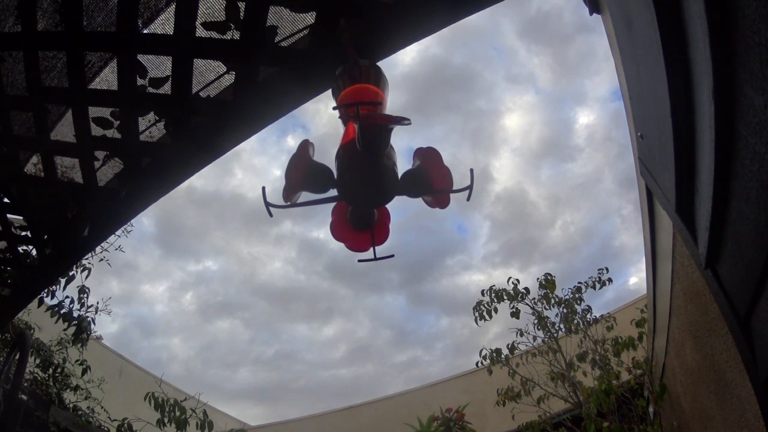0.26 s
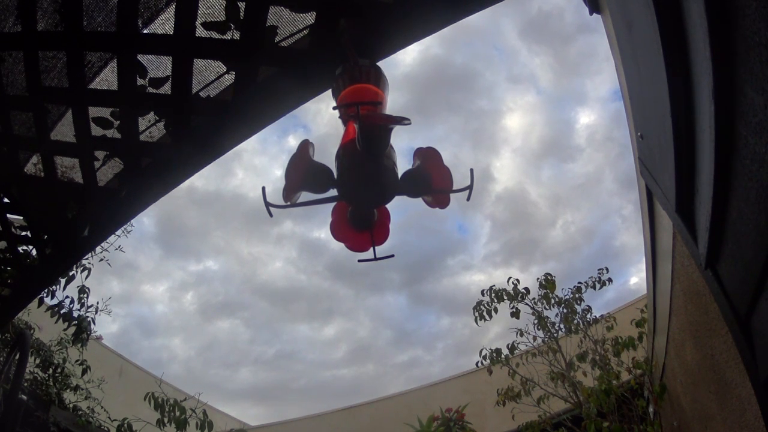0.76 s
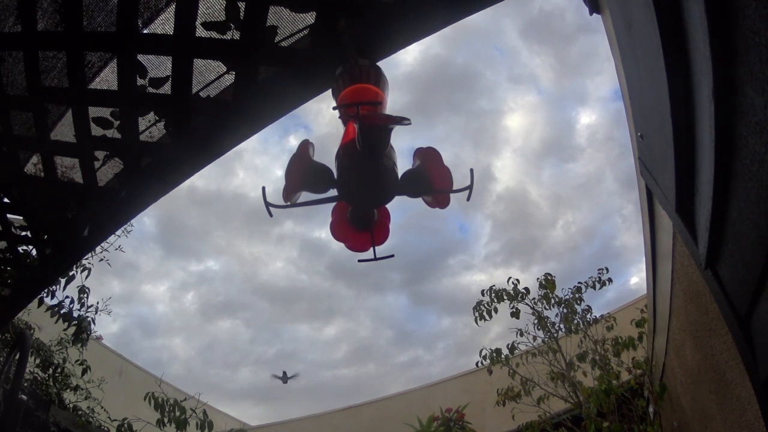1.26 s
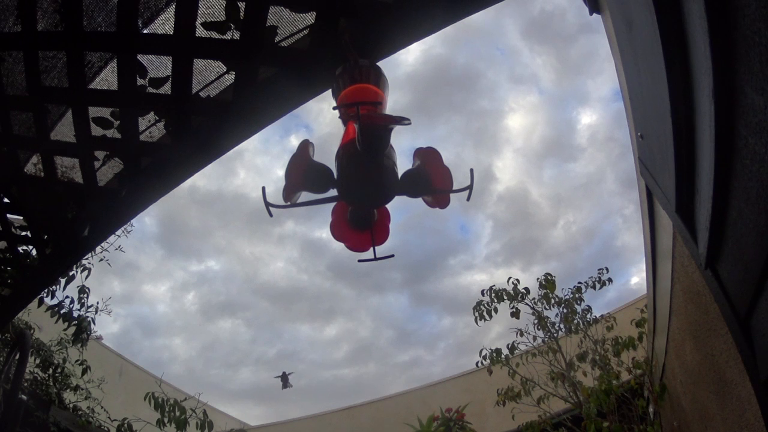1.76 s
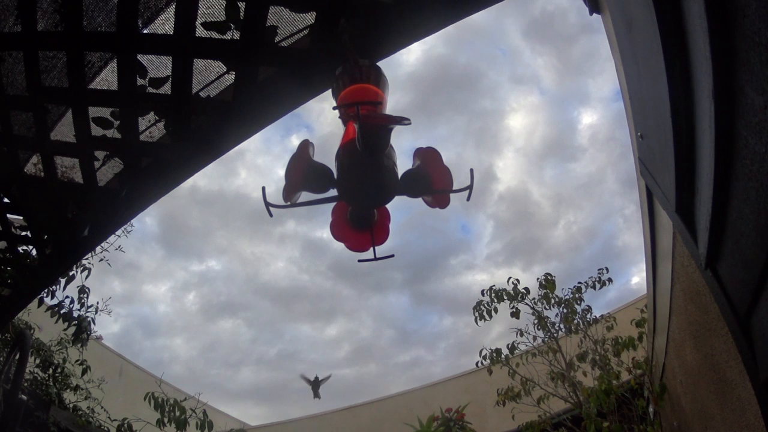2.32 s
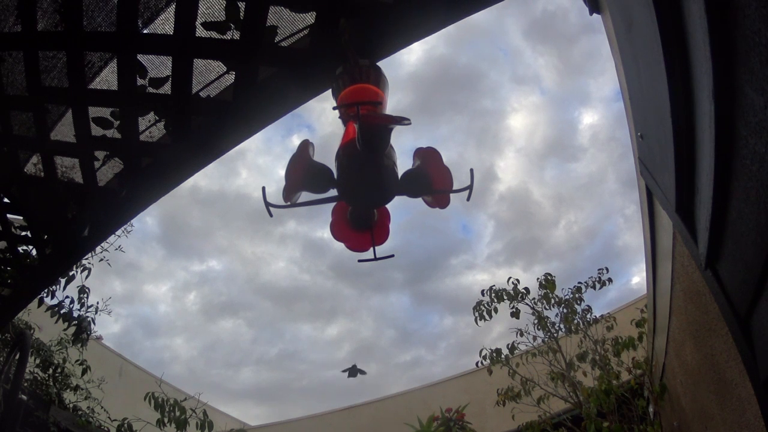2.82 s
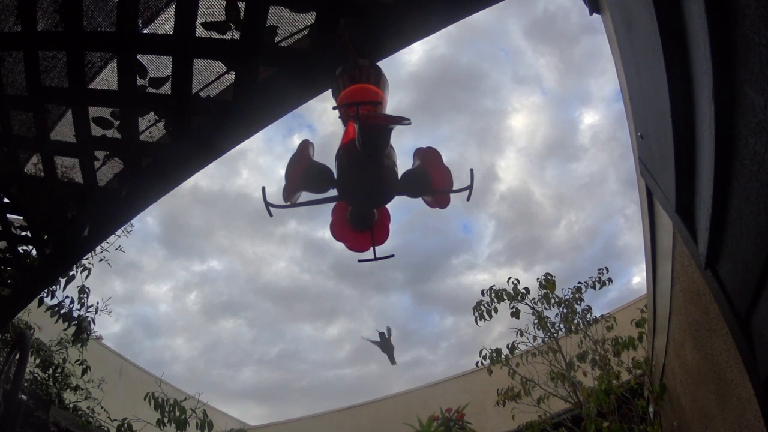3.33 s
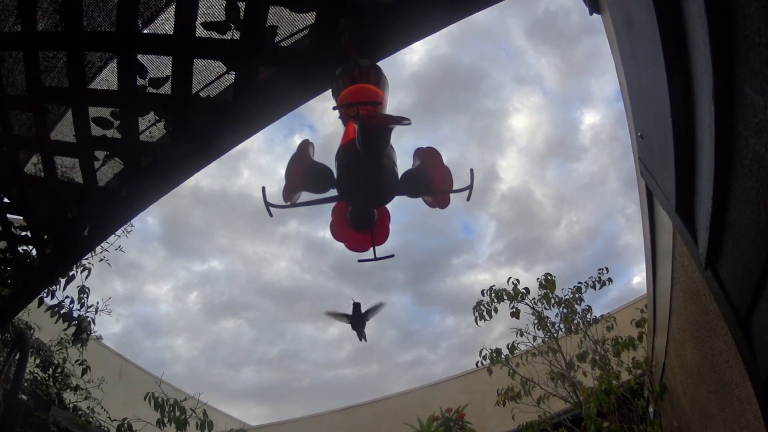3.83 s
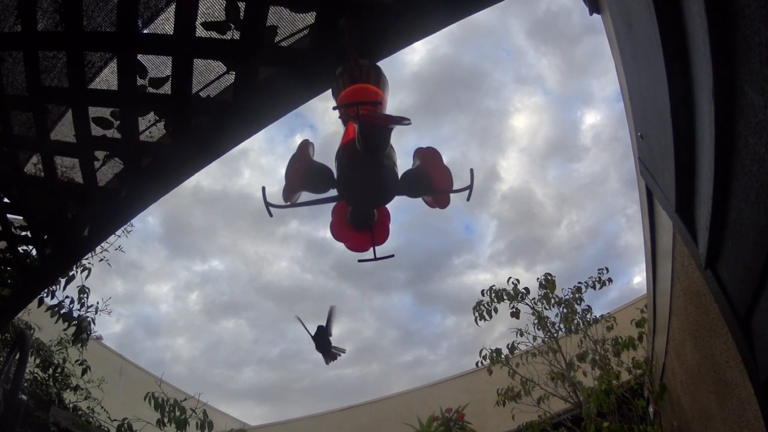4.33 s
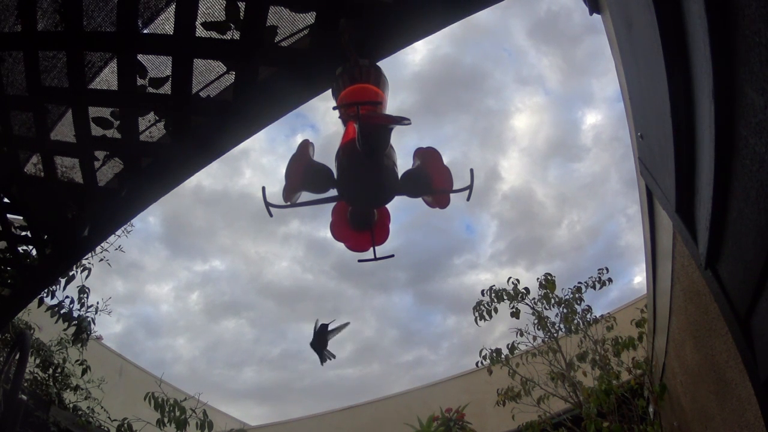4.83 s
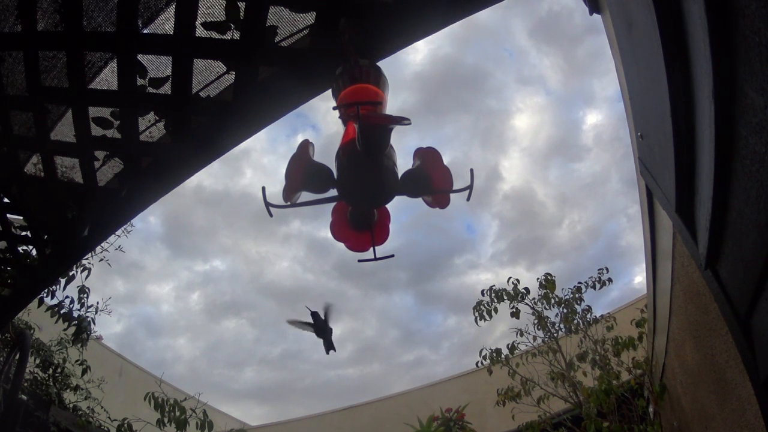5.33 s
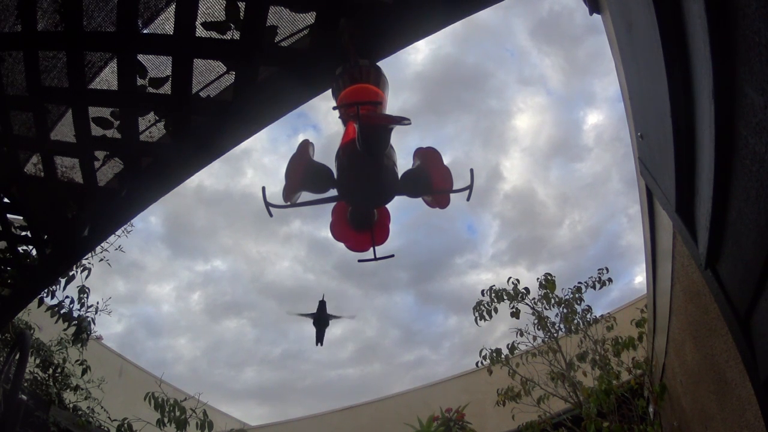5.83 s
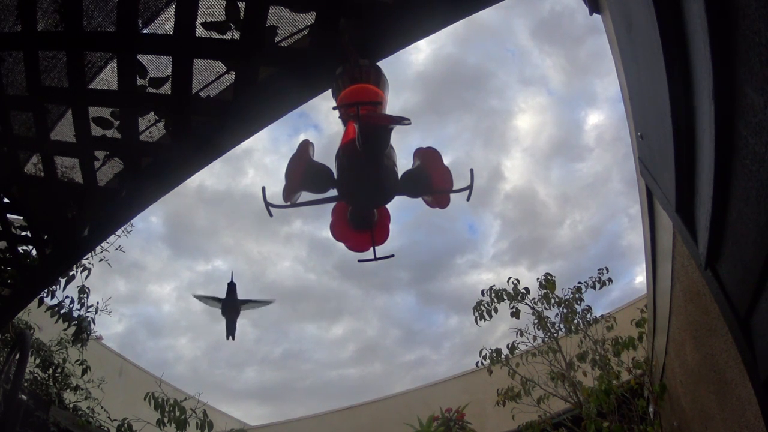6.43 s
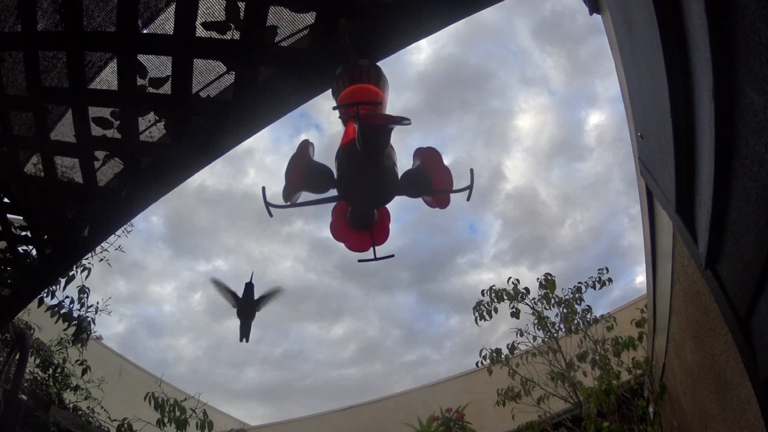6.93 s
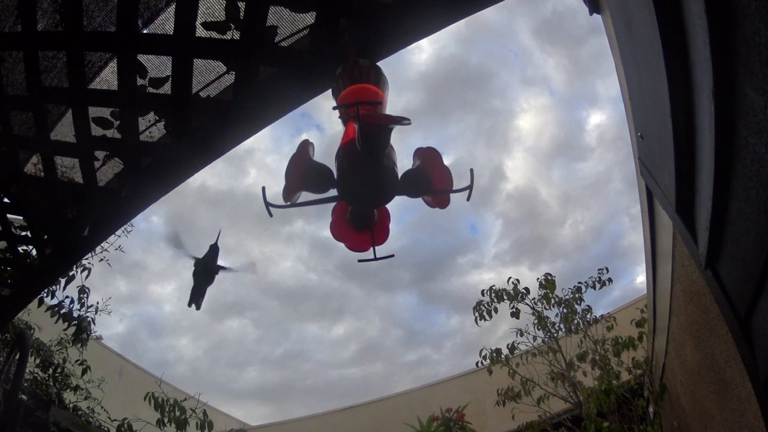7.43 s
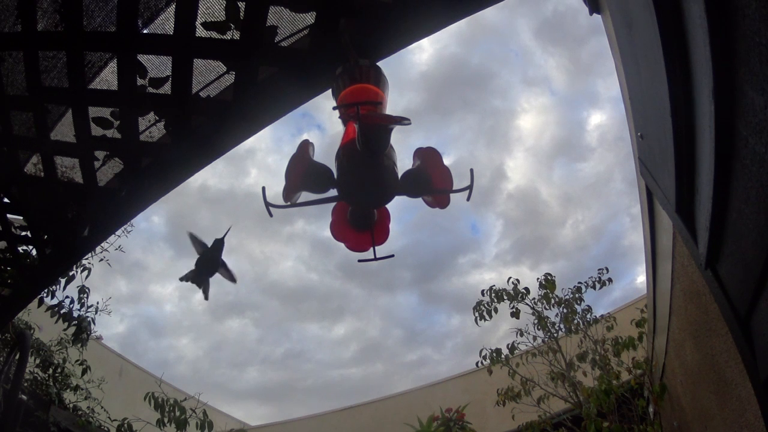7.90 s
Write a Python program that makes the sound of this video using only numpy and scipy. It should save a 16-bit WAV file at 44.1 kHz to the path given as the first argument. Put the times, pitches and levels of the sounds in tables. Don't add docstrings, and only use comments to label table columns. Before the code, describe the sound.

A quiet backyard with a steady, slightly wavering low motor drone from a fan unit and a soft, dull wash of distant town traffic, constant for about eight seconds. A hummingbird's wings are barely audible at first, then flutter as a low buzzing hum with feathery hiss, surging at darts near 1.2, 3.0, 3.75, 4.2, 6.2 and 7.4 s. Sharp, dry, very high chips, each a click-like whistle dropping steeply within about a hundredth of a second, start faintly at 1.55, 1.9, 2.3 and 2.8 s. A close pair comes at 3.5 and 3.6, then clearer single chips at 4.1, 4.75, 5.7, 6.1, 6.8 and 7.3, the loudest at 8.0 s. Short scattered reflections from feeder, lattice and walls follow each. The small stereo camera microphone sits near a wall; the bird gradually approaches, slightly left, then central.

```python
import sys
import numpy as np
from scipy import signal
from scipy.io import wavfile
from scipy.ndimage import uniform_filter1d

SR = 44100
rng = np.random.default_rng(int(sys.argv[2]) if len(sys.argv) > 2 else 0)


def amplitude_ratio(level_db):
    exponent = np.asarray(level_db, float) / 20
    return 10 ** exponent


def int16_out(signal):
    q = np.round(np.clip(np.atleast_2d(signal).T, -1, 1) * 32767)
    wavfile.write(sys.argv[1], SR, q.astype(np.int16))


N = 359856

# t/s, swish level/dB, hum level/dB, wing beat f/Hz, left-right balance/dB
FLIGHT = [(0, -72, -71, 45.2, -1), (1.1, -67, -68, 45.53, -1), (1.6, -64, -48, 44.3, -3),
          (2.2, -63, -62, 44.07, -3), (2.85, -62, -52, 45.07, -3.5), (3.25, -61, -45, 45, 0.5),
          (3.6, -62, -56, 45.7, -4), (4.5, -61, -46.5, 44.98, -3), (4.95, -61, -44, 43.25, -1.5),
          (5.45, -59, -55, 42.06, -3.5), (6.0, -61, -60, 43.15, -2), (6.6, -59, -46.5, 43.6, 0),
          (7.3, -58.5, -44.5, 42.4, 1), (8.16, -57, -44.5, 43, 0)]
# f/Hz, phase/rad
PORT_LEAD = [(60, -.3), (800, -.3), (1000, -2.4), (1400, -1.85), (2400, -1.4), (4000, -1.4), (5000, -.8),
             (7500, -.1), (11000, -.05)]
# f/Hz, level/dB
PORT_TILT = [(60, -2.2), (170, -2.6), (350, -2), (520, -.7), (700, 1), (930, 4.5), (1200, 1), (1600, -1.3),
             (2500, .3), (11000, 0)]
PORT_SHARE = np.array([[.5], [-.5]])
FAR_DB = -26
CHIP_START_MS, CHIP_END_MS = -16, 14
CHIP_MS = np.arange(CHIP_START_MS, CHIP_END_MS, 1000 / SR)


def evened(x):
    return x / np.sqrt(np.mean(x ** 2) + 1e-20)


def read(points, hz):
    f, value = np.transpose(points)
    return np.interp(np.log(hz + 1), np.log(f + 1), value)


def add(mix, s, sound):
    part = mix[:, round(s * SR):][:, :sound.shape[1]]
    part += sound[:, :part.shape[1]]


def drift(low_hz, top_hz, t):
    rates = np.geomspace(low_hz, top_hz, num=24)
    return evened(sum(np.sin(2 * np.pi * (f * t + rng.random())) / np.sqrt(f) for f in rates))


def noise(spectrum, patchy_db):
    # f/Hz, left-right likeness (0 to 1)
    likeness = [(60, .99), (200, .99), (350, .9), (520, .76), (700, .58), (930, .1), (1350, .54),
                (2100, .36), (4000, .24), (6000, .42), (11000, .72)]
    hz = np.fft.rfftfreq(2048, 1 / SR)
    a, b, c, d, patches = rng.standard_normal((N // 512 + 5, len(hz), 5)).T
    patches = uniform_filter1d(patches, size=14, axis=0)
    patches = evened(uniform_filter1d(patches, size=8, axis=1))
    same = np.clip(read(likeness, hz), 0, 1)[:, None]
    right = a + 1j * b
    left = same * right * np.exp(1j * read(PORT_LEAD, hz))[:, None]
    left = left + np.sqrt(1 - same ** 2) * (c + 1j * d)
    tilt = amplitude_ratio(read(PORT_TILT, hz) / 2)[:, None]
    colour = amplitude_ratio(read(spectrum, hz)[:, None] + patchy_db * patches)
    z = np.array([left * tilt, right / tilt]) * colour
    return evened(signal.istft(z, nperseg=2048, noverlap=1536)[1][:, :N])


def wings(t):
    # f/Hz, level per Hz/dB
    feathers = [(800, 1.5), (2000, -0.5), (4000, -0.5), (7000, -5.5), (10000, -2.5), (11500, -10.5)]
    # multiple of the wing beat, level/dB
    harmonics = [(1, -12.5), (2, -4), (3, -2), (4, 0.5), (5, -6), (6, -9.5), (7, -27)]
    # t/s, peak swish level/dB
    darts = [
        (1.23, -55.5),
        (3.02, -53),
        (3.751, -52),
        (4.18, -56),
        (4.4, -57),
        (5.2, -60),
        (6.22, -53),
        (7.1, -60),
        (7.43, -54),
        (8.06, -57),
    ]
    dart_hum_db = 14.5
    swish_db_per_s, hum_db_per_s = 84, 105
    spurt_hz_per_db, gentle_db, spurt_s = .66, -60.5, .21
    s, *columns = np.transpose(FLIGHT)
    swish_db, hum_db, hz, _ = (np.interp(t, s, c) for c in columns)
    swish_power, hum_power = amplitude_ratio(2 * swish_db), amplitude_ratio(2 * hum_db)
    for at, db in darts:
        away_s = np.abs(t - at)
        swish_power = swish_power + amplitude_ratio(2 * (db - swish_db_per_s * away_s))
        hum_power = hum_power + amplitude_ratio(2 * (db + dart_hum_db - hum_db_per_s * away_s))
        hz = hz + spurt_hz_per_db * (db - gentle_db) * np.clip(1 - away_s / spurt_s, 0, 1)
    turns = 2 * np.pi * np.cumsum(hz * (1 + .02 * drift(.98, 12, t))) / SR
    hum = evened(sum(amplitude_ratio(db) * np.cos(k * turns + rng.uniform(0, 6.1) - .39 * PORT_SHARE)
                     for k, db in harmonics))
    hum = np.sqrt(hum_power) * hum * amplitude_ratio(np.array([[-1.2], [1.2]]))
    dart = np.clip((hz - 44) / 5, 0, 1)
    strokes = 1 + .35 * (1 - dart) * np.cos(turns) + .5 * dart * np.cos(2 * turns)
    return hum + np.sqrt(swish_power) * strokes * noise(feathers, patchy_db=2.5)


def drone(t):
    # f/Hz, width/Hz, level/dB
    tones = [(28, 1.7, -61), (122, 3, -50.5), (151.3, 5, -46.5), (311.3, 5, -61), (488.2, 20, -56),
             (624.7, 1.005, -57.5), (840, 3, -64.5)]
    out, slow = np.zeros((2, N)), t[::64]
    for hz, width_hz, db in tones:
        wander = .4 * width_hz * drift(.5 + width_hz / 4, 2 + width_hz, slow)
        swell_db = min(.6 * width_hz, 3) * drift(1 + width_hz / 2, 4 + 2 * width_hz, slow)
        pitch_hz = hz + wander.repeat(64)[:N]
        turns = 2 * np.pi * np.cumsum(pitch_hz) / SR + PORT_SHARE * read(PORT_LEAD, hz)
        level_db = db + swell_db.repeat(64)[:N] + PORT_SHARE * read(PORT_TILT, hz)
        out += amplitude_ratio(level_db) * np.sqrt(2) * np.sin(turns)
    return out


def town(t):
    # f/Hz, level per Hz/dB
    wash_colour = [(12, -55), (22, -18), (55, -19), (100, -8.5), (170, -6.5), (350, -10.5), (520, -13.5),
                   (700, -16), (1000, -17.5), (1400, -23.5), (2400, -26.5), (3400, -33), (6000, -37.5),
                   (11000, -43.5)]
    swell_db = .35 * drift(.295, 4, t)
    return amplitude_ratio(-41.5 + swell_db) * noise(wash_colour, patchy_db=.56)


def chip(level_db, lead_ms, fade_db, notch_hz, pan_db, chance):
    # t from the knee/ms, f/Hz
    fall = [(-10, 8480), (-6, 8340), (-4, 8030), (-2, 7470), (-1, 6800), (0, 5950), (2.8, 3450), (4, 2950),
            (7, 2000)]
    # f/Hz, level/dB
    beak_colour = [(2000, 11), (3000, -3), (4000, -2.5), (5000, 0), (6000, -1), (7500, -1), (8500, 2),
                   (11000, 3.5), (12500, -19)]
    top_hz = 8430
    lattice_share, lattice_ms = .25, .6
    end_ms = 2.3 + .67 * fade_db
    overtone_db = max(5.5 - 2 * lead_ms, -10.5)
    hiss_db = -22.5 - .46 * (level_db - FAR_DB)
    ms = CHIP_MS
    hz = uniform_filter1d(np.interp(ms, *np.transpose(fall)), size=40) * top_hz / 8400
    turns = 2 * np.pi * np.cumsum(hz) / SR
    gate = np.clip((ms + lead_ms + .2) / max(1.6, lead_ms - 5.5), 0, 1)
    gate *= np.interp(ms - min(end_ms, 3.6), [-.5, .5, 2, 3], [1, .35, .24, 0])
    slope_db = np.where(ms < -2.1, 1.5, -fade_db) * (ms + 2.1)
    flutter_db = .7 * evened(uniform_filter1d(uniform_filter1d(chance[0], size=30), size=30))
    effort = amplitude_ratio(level_db + slope_db + flutter_db) * np.sin(np.pi / 2 * gate) ** 2
    effort *= np.abs(1 - lattice_share * np.exp(2j * np.pi * (hz - notch_hz) * lattice_ms / 1000))
    out = []
    for side in (-.5, .5):
        late = -side * .3 * 7000 / hz
        whistle = amplitude_ratio(read(beak_colour, hz)) * np.sin(turns - late)
        octave = amplitude_ratio(overtone_db + read(beak_colour, 2 * hz)) * np.sin(2 * turns - late / 2)
        out.append(amplitude_ratio(-side * pan_db) * effort * (whistle + octave))
    after = ms + lead_ms + 3.7
    click = evened(uniform_filter1d(chance[2], size=3))
    tick = amplitude_ratio(level_db - 21) * (after > 0) * np.exp(-np.abs(after) / .4) * click
    air = signal.lfilter(*signal.butter(1, [2500, 9000], "band", fs=SR), chance[1])
    puff = np.interp(after, [-1, 1, 4, 6, lead_ms + 6, lead_ms + 11], [0, .45, .55, 1, 1, 0])
    return np.array(out) + tick + amplitude_ratio(level_db + hiss_db) * puff * evened(air)


def nearby(x, draw):
    late_ms = .45 + 3.2 * np.arange(6) / 6 + .45 * draw[:, 0]
    size = amplitude_ratio(-3.5 * late_ms - 6 * draw[:, 1]) * np.sign(draw[:, 2] - .5)
    taps = np.zeros((2, 256))
    taps[:, np.round(late_ms * SR / 1000).astype(int)] = size * amplitude_ratio(6.8 * draw[:, 3:].T)
    dull = signal.lfilter(*signal.butter(2, 7800, fs=SR), x)
    return signal.oaconvolve(dull, taps / np.linalg.norm(size), axes=1)[:, :x.shape[1]]


def yard(x):
    # f/Hz, 60 dB decay time/s
    decay = [(2000, 0.07), (4000, 0.22), (6000, 0.17), (8000, 0.18), (11000, 0.041)]
    # f/Hz, level/dB
    wall_colour = [(2500, 1), (4200, -1), (6000, 1.5), (8000, -4.5), (11000, 4)]
    out = np.zeros((2, N))
    for k in range(3):
        signs = rng.choice([-1., 1.], (3, SR // 2))
        shared, left, right = signs * (rng.random((3, SR // 2)) < .1)
        taps = 1.1 * shared + np.array([left, right])
        taps[:, :round(.003 * SR)] = 0
        hz, t, z = signal.stft(taps, SR, nperseg=128)
        fading_db = read(wall_colour, hz)[:, None] - 60 * t / read(decay, hz)[:, None]
        tail = signal.istft(z * amplitude_ratio(fading_db), SR, nperseg=128)[1][:, :SR // 4]
        tail = tail / np.linalg.norm(tail[0])
        turn = np.sqrt(2 / 3) * np.cos(2 * np.pi * (np.arange(N) / SR * .77 + k / 3))
        out += signal.oaconvolve(turn * x.mean(0)[None], tail, axes=1)[:, :N]
    return out


def scene():
    chips = [(1.555, -27.5, 7.6, 1.5, 6670), (1.9144, -26.5, 10.6, .6, 6500), (2.2908, -25, 5.9, 1.2, 5500),
             (2.8064, -22.5, 7, 3.5, 7900), (3.5241, -23, 7.7, 0, 6740), (3.6107, -26.5, 3.7, 1, 6740),
             (4.0694, -16, 7.3, 2, 6368), (4.7494, -18, 6.9, 1.4, 6400), (5.686, -20.5, 8.4, 2, 6600),
             (6.0972, -14, 5.7, 3, 6080), (6.7637, -18, 8.4, 1, 7070), (7.3233, -14, 5.93, 2, 6830),
             (7.9826, -11.5, 6.7, 3.5, 6470)]
    near_db = -10.5
    yard_db, yard_lag = -9, .44
    t, bird, sent = np.arange(N) / SR, np.zeros((2, N)), np.zeros((2, N))
    path_s, pan_db = np.transpose(FLIGHT)[[0, -1]]
    chance = rng.standard_normal((len(chips), 3, len(CHIP_MS)))
    places = rng.random((len(chips), 6, 5))
    for (s, db, lead_ms, fade_db, notch_hz), draw, place in zip(chips, chance, places):
        note = chip(db, lead_ms, fade_db, notch_hz, np.interp(s, path_s, pan_db), draw)
        start_s = s + CHIP_START_MS / 1000
        add(bird, start_s, note + amplitude_ratio(near_db) * nearby(note, place))
        add(sent, start_s, amplitude_ratio(yard_db - yard_lag * (db - FAR_DB)) * note)
    return bird + yard(sent) + wings(t) + drone(t) + town(t)


def low_pass(x):
    return signal.sosfilt(signal.butter(12, 12320, fs=SR, output="sos"), x)


def record(dry):
    # f/Hz, level/dB
    skirt = [(0, 0), (11000, 0), (11250, -16), (11600, -26), (12300, -38), (12700, -70), (22050, -90)]
    edge_hz, open_db = 11040, -78
    hz, db = np.transpose(skirt)
    fine = np.linspace(0, SR / 2, num=257)
    limit = signal.firwin2(601, fine, amplitude_ratio(np.interp(fine, hz, db)), window=("kaiser", 7), fs=SR)
    wide = signal.oaconvolve(dry, limit[None], "same", axes=1)
    lowpass = signal.firwin(2001, edge_hz, window=("kaiser", 9), fs=SR)
    low = signal.oaconvolve(wide, lowpass[None], "same", axes=1)
    sliver = wide - low
    power = uniform_filter1d((sliver ** 2).mean(0), size=900)
    gate = uniform_filter1d(1. * (power > amplitude_ratio(2 * open_db)), size=500)
    return low_pass(low + gate * sliver)


dry = scene()
out = record(dry)
int16_out(out)
```